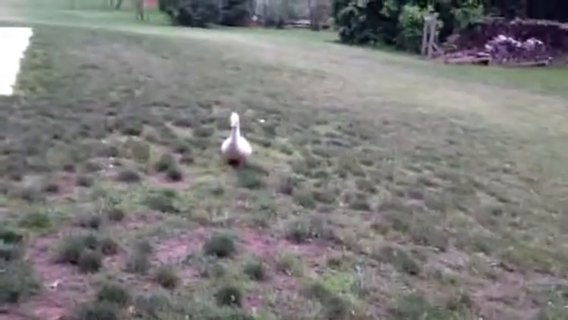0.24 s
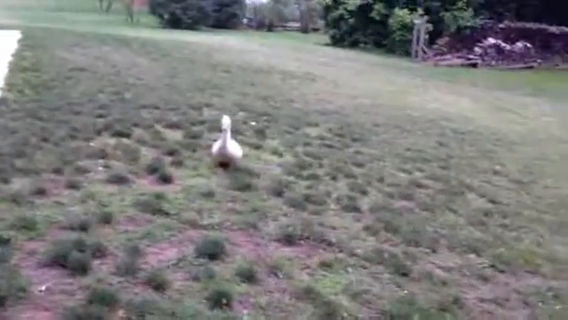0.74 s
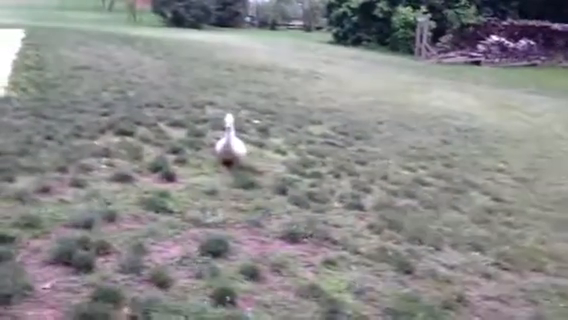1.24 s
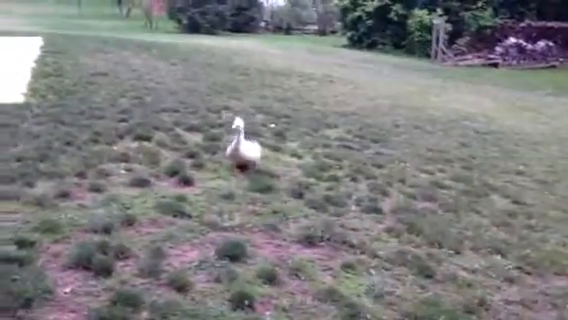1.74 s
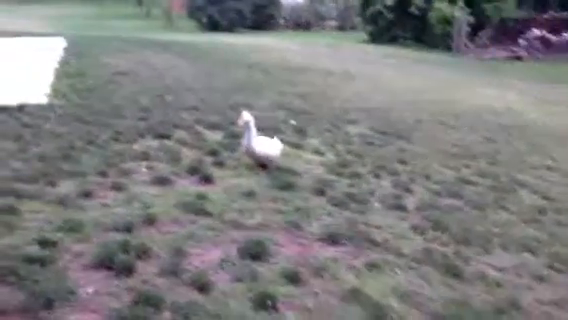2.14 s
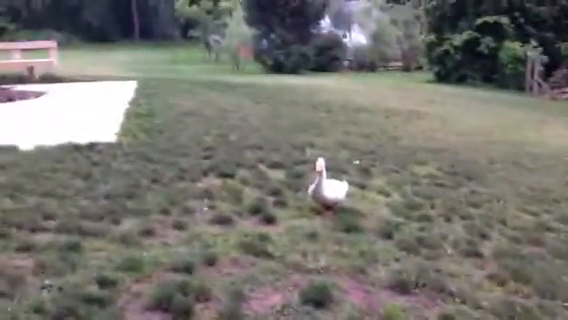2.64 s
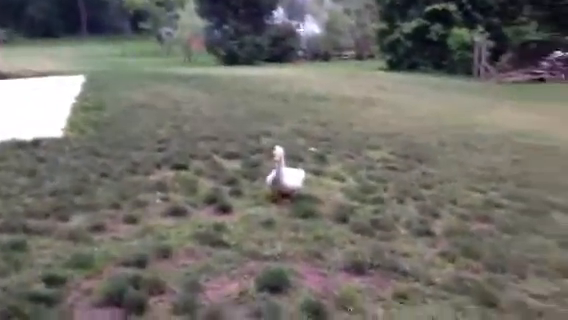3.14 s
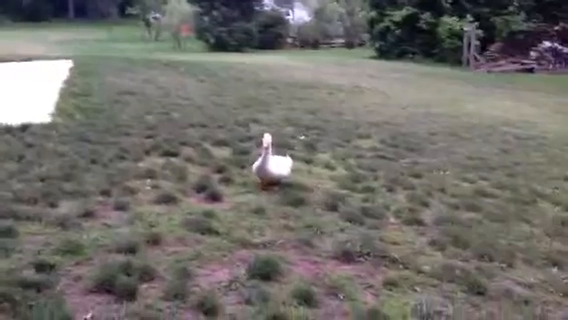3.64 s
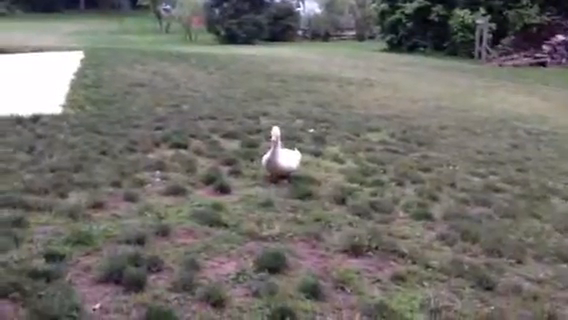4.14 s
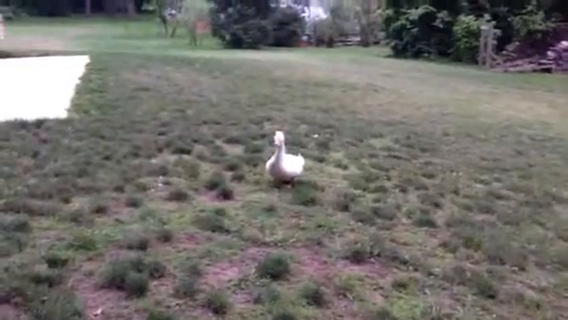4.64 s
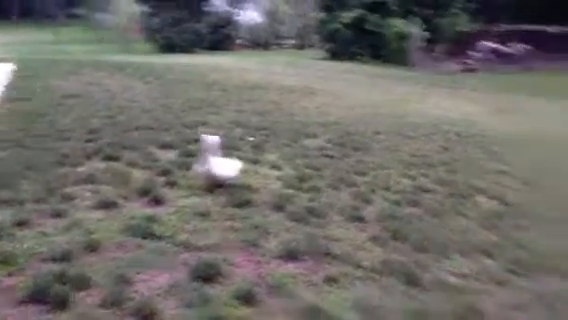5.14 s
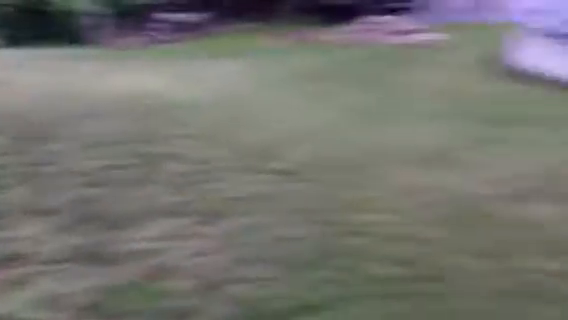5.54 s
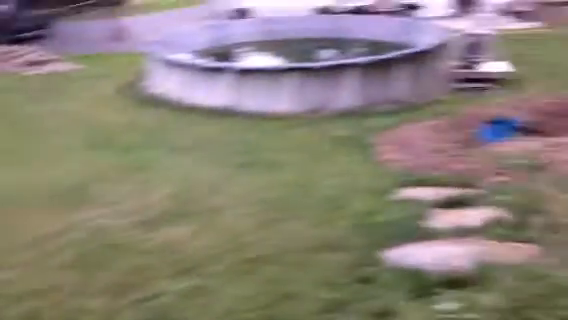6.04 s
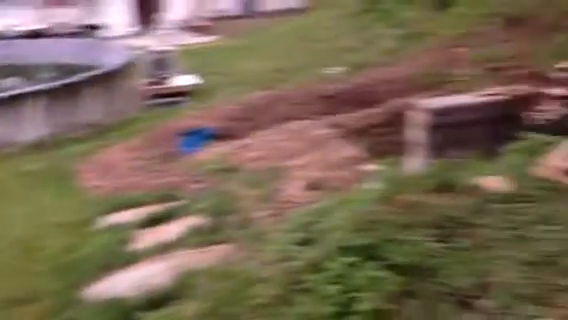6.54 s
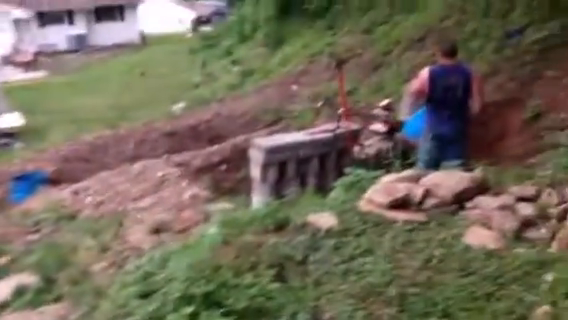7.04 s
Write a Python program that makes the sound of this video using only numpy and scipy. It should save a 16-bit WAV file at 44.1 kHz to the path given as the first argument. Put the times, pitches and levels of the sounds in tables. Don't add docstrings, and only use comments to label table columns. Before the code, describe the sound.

A duck gives six slow, raspy quacks on a lawn while an unseen shovel clanks on stones and thuds into soil over a faint motor drone.

```python
import sys
import numpy as np
from scipy import signal
from scipy.fft import rfft, irfft, next_fast_len
from scipy.io import wavfile
from scipy.ndimage import uniform_filter1d, map_coordinates

SR = 44100
rng = np.random.default_rng(int(sys.argv[2]) if len(sys.argv) > 2 else 0)


def voltage_ratio(level):
    return 10 ** (np.asarray(level, float) / 20)


def generate_wav(signal):
    frames = np.transpose(np.atleast_2d(signal))
    scaled = np.clip(frames, -1, 1) * 32767
    pcm = np.round(scaled).astype(np.int16)
    wavfile.write(sys.argv[1], SR, pcm)


N = 321489

# time in seconds, pitch in Hz.
MOTOR_PITCH = [(0, 123.4), (1.0, 122.6), (2.2, 121.3), (2.6, 122.3), (3.5, 120.9), (5.2, 118.1),
               (7.29, 118.1)]
# time in seconds, level in dB.
MOTOR_LEVEL = [(0, -61.5), (.65, -58), (1.36, -66.5), (1.74, -59.5), (2.3, -62), (2.6, -63.5), (3.4, -59.5),
               (3.65, -64), (3.95, -60.5), (4.4, -63), (5.05, -62.5), (5.34, -66.5), (5.9, -61),
               (6.35, -59.5), (6.62, -63.5), (7.29, -61)]
# frequency in Hz, density in dB per Hz.
RUMBLE_COLOUR = [(15, -62), (25, -52), (86, -18), (99, -7.5), (118, -5), (146, -0.5), (303, -1.5),
                 (362, -6.5), (426, -5), (1200, -34), (1560, -58), (2640, -120)]
# time in seconds, level in dB.
RUSTLE_LEVEL = [(0, -71.5), (.6, -79), (1.4, -75), (2.2, -72.5), (3.2, -75.5), (4.2, -77.5), (5.3, -73),
                (6, -72.5), (6.4, -75), (6.8, -70.5), (7.29, -68.5)]
# frequency in Hz, density in dB per Hz.
LEAF_COLOUR = [(600, -36), (1200, -18), (2200, -3), (3800, -8.5), (5100, -9.5), (7000, -32)]
# start in seconds, level in dB, hold in seconds, t60 in seconds.
SCRAPES = [
    (.002, -55, 0.0036, 0.31),
    (2.378, -45, 0.016, 0.51),
    (4.359, -55.5, .045, .36),
    (4.955, -58, 0.014, 0.41),
    (5.097, -60, 0.0066, 0.42),
    (6.165, -70, 0.13, 0.37),
    (6.477, -52, 0.022, .2),
    (6.5, -55.5, 0.036, 0.45),
]
# frequency in Hz, width in Hz, level in dB.
BLADE_MODES = [(1510, 170, 3.5), (2067, 126, 4.5), (2630, 164, 4.5), (3124, 63, 7.5), (3490, 300, 1),
               (4600, 310, -4), (5770, 240, -7)]
# frequency in Hz, density in dB per Hz.
GRIT_COLOUR = [(500, -23), (1000, -6.5), (2500, -16), (5000, 5.5), (8000, -11), (13000, -23)]
# start in seconds, length in seconds, start pitch in Hz, end pitch in Hz, level in dB.
BIRD_NOTES = [(0.068, 0.048, 1790, 1600, -70), (.44, 0.036, 2540, 2370, -74),
              (1.275, 0.022, 5180, 5450, -65.5), (2.368, 0.023, 2910, 3060, -60),
              (3.269, 0.023, 1980, 1920, -69), (4.009, 0.067, 3460, 3800, -78),
              (4.045, 0.091, 3880, 3640, -73.5), (4.298, .05, 2880, 2850, -70),
              (6.006, .14, 1754, 1590, -71.5), (6.7, 0.017, 4500, 4370, -71),
              (6.911, 0.022, 1280, 1490, -67), (7.0, 0.023, 3224, 3100, -68),
              (7.133, 0.088, 2430, 2390, -65)]
# start in seconds, level in dB.
CHIP_PHRASE = (.017, 5120, 5000), [(.225, -71), (.27, -78), (.495, -75), (.53, -69), (.575, -72),
               (1.245, -73), (2.265, -73), (2.3, -73), (3.365, -76), (3.41, -77), (3.45, -74)]
TSIP_PHRASE = (0.018, 4820, 4450), [(6.16, -70), (6.205, -75), (6.255, -67), (6.735, -65), (6.775, -62.5),
               (6.83, -62.5)]
RISING_PHRASE = (0.0387, 1780, 2057), [(6.44, -73), (6.712, -64), (6.945, -63), (7.18, -63)]
FALLING_PHRASE = (0.038, 2930, 2370), [(6.56, -61), (6.795, -62.5), (7.04, -60.5)]
# start in seconds, peak in dB, snap in dB over the peak, ring in Hz.
TAPS = [(.367, -55, -15, 2450), (.506, -53, -15, 830), (1.156, -53.5, 8, 1880), (1.174, -45.5, 2, 1805),
        (2.379, -29, -26, 1997), (2.393, -29, -27, 2036), (3.271, -52, -18, 1940),
        (4.076, -51.5, -17, 1950), (4.312, -51, -9, 2860), (4.351, -44, -12, 2140), (4.361, -38, -22, 2374),
        (4.957, -41.5, -24, 2270), (5.095, -40.5, -27, 1940), (5.174, -47.5, -19, 1510),
        (6.208, -55, -17, 4617), (6.476, -41, 3.5, 3370), (6.493, -33.5, -5, 1530), (6.53, -38, -22, 5550),
        (6.556, -42.5, -8, 2800), (6.732, -47, -25, 956), (6.799, -47.5, -6, 1220),
        (7.099, -34.5, -34, 930), (7.161, -39, -29, 1420), (7.239, -48.5, -20, 2644)]
# start in seconds, peak in dB.
CLACKS = [
    (0.628, -47.5),
    (1.615, -51.5),
    (1.643, -46.5),
    (2.591, -49.5),
    (3.524, -46.5),
    (4.449, -46),
    (5.455, -50),
]
# voice full at in seconds, bill fully open after in seconds, bill shuts after in seconds,
# throat level in dB, fastest flaps per second.
QUACKS = [
    (.688, .24, 0.32, -39, 89.5),
    (1.704, .22, 0.33, -40, 92),
    (2.649, 0.22, .34, -38.5, 87.4),
    (3.567, 0.22, 0.29, -39.5, 90.5),
    (4.508, .21, .315, -39.5, 87),
    (5.505, 0.22, 0.38, -45.5, 93),
]
HEAD_TURN_DB = [-3, 1.5, 0.5, 1, 0, 6]
# frequency in Hz, width in Hz, level in dB.
THROAT_MODES = [(1234, 111, -6), (1420, 33.7, 4.5), (1765, 48.5, 6.5)]
# frequency in Hz, width in Hz, level in dB.
WEAK_THROAT_MODES = [(1171, 68, 5.5), (1373, 82, 4), (1590, 140, -14)]
# frequency in Hz, width in Hz, level in dB.
BILL_BASE_MODES = [(2200, 94, 6), (2580, 230, 0.5)]
# frequency in Hz, width in Hz, level in dB.
BILL_TIP_MODES = [(2787, 94, 4), (3366, 114, -3.5)]
# frequency in Hz, width in Hz, level in dB.
WHISTLE_MODES = [(3820, 930, 0.5), (4530, 197, 9.5), (4914, 260, 1.5), (5820, 850, -8.5),
                 (7000, 1400, -22.5)]
# frequency in Hz, width in Hz, dip in dB.
POCKETS = [(2040, 200, -16), (3620, 220, -14), (5560, 300, -10)]
# start in seconds, peak in dB, pitch in Hz, t60 in seconds.
THUDS = [(1.174, -39, 194, 0.02), (2.38, -32, 537, 0.015), (2.394, -40, 194, 0.053),
         (4.365, -40, 332, 0.041), (4.398, -45, 169, 0.062), (4.954, -47, 231, 0.046),
         (4.971, -39.5, 278, 0.035), (6.495, -25, 240, 0.031), (6.503, -38, 163, 0.068),
         (7.098, -36, 255, 0.027), (7.109, -44.5, 183, 0.039)]
# start in seconds, level in dB, pitch in Hz, t60 in seconds.
RINGS = [
    (2.381, -45, 2030, 0.38),
    (2.381, -46, 3250, 0.42),
    (6.53, -60.5, 5700, 0.5),
    (7.1, -55, 4500, .03),
]
# frequency in Hz, t60 in seconds.
YARD_T60 = [(300, 0.36), (2000, 0.33), (8000, 0.19)]
# frequency in Hz, density in dB per Hz.
HISS_COLOUR = [(410, -11), (700, -0.5), (906, -2), (3050, -7), (3750, -3.5), (5660, -6), (13800, -8.5),
               (15300, -11.5)]

ATTACK_S, ATTACK_DB, SWELL_DB = 0.038, 22, 2.5
SETTLE_S, SETTLE_DB = 0.04, 1.5
DROOP_S, DROOP = 0.021, 0.84
SHUT_S, SHUT_DB, FADE_S, FADE_DB = 0.055, 12, 0.065, 55
REST_RATE, RATE_SAG = 75.5, 0.6
TURN_DULLS = 0.73
BILL_SHUT_DB, BILL_OPEN_DB = -23, -3.5
TIP_SHUT_DB, TIP_OPEN_DB = -32.5, -10
WHISTLE_SHUT_DB, WHISTLE_OPEN_DB = -20, -9.5
THROAT_SHIFT, SHIFTS_PER_S = 0.03, 20


def unit(x):
    return x / np.sqrt(np.mean(x ** 2) + 1e-20)


def along(points, hz):
    f, v = np.transpose(points)
    return np.interp(np.log(hz + 1), np.log(f + 1), v)


def curves(rows):
    s, *cols = np.transpose(rows)
    return [np.interp(np.arange(N) / SR, s, c) for c in cols]


def spans(tables):
    rows = []
    for table in tables:
        first, last = table[0], table[-1]
        rows += [(first[0] - 0.006, -120, *first[2:]), *table, (last[0] + 0.012, -120, *last[2:])]
    return curves(rows)


def wobble(rate):
    knots = rng.standard_normal(int(N * rate / SR) + 4)
    return map_coordinates(knots, [np.arange(N) * rate / SR])


def filtered(x, response):
    m = next_fast_len(N + SR // 2)
    return irfft(rfft(x, m) * response(np.fft.rfftfreq(m, 1 / SR)), m)[:N]


def bandpass(x, order, low_hz, high_hz):
    return signal.sosfilt(signal.butter(order, [low_hz, high_hz], "bandpass", fs=SR, output="sos"), x)


def resonant(x, modes, low_hz, high_hz):
    def body(f):
        total = 0
        for k, (c, w, db) in enumerate(modes):
            total = total + (-1) ** k * voltage_ratio(db) * 1j * f * w / (c * c - f * f + 1j * f * w)
        return total

    return unit(bandpass(filtered(x, body), 3, low_hz, high_hz))


def noise(spectrum, patchy_db):
    z = signal.stft(rng.standard_normal(N), nperseg=512)[2]
    field = uniform_filter1d(uniform_filter1d(rng.standard_normal(z.shape), 5, 0), 10, 1)
    x = signal.istft(z * voltage_ratio(patchy_db * unit(field)), nperseg=512)[1][:N]
    return unit(filtered(x, lambda hz: voltage_ratio(along(spectrum, hz))))


def add(track, s, sound):
    part = track[round(s * SR):][:len(sound)]
    part += sound[:len(part)]


def motor():
    (hz,), (rumble_db,) = curves(MOTOR_PITCH), curves(MOTOR_LEVEL)
    mean_db = rumble_db.mean()
    drone_db = mean_db - 3.5 + 1.15 * (rumble_db - mean_db) + 0.9 * wobble(4.28)
    phase = 2 * np.pi * np.cumsum(hz + 0.76 * wobble(12)) / SR
    drone = voltage_ratio(drone_db + 3.0 + 0.33 * wobble(11)) * np.sin(phase)
    slipping = voltage_ratio(drone_db - 19) * np.sin(0.97 * phase)
    throb = 1 + 0.078 * np.cos(phase / 2) + 0.37 * np.cos(phase)
    rumble = unit(throb * voltage_ratio(0.59 * wobble(25)) * noise(RUMBLE_COLOUR, patchy_db=3.0))
    return drone + slipping + voltage_ratio(rumble_db + 1.0) * rumble


def garden():
    return voltage_ratio(curves(RUSTLE_LEVEL)[0]) * noise(LEAF_COLOUR, patchy_db=2.5)


def scrapes():
    grains = voltage_ratio(1.26 * wobble(250) + 0.65 * wobble(50))
    steel = resonant(grains * rng.standard_normal(N), BLADE_MODES, low_hz=905, high_hz=9050)
    drag = unit(steel + 0.5 * unit(grains * noise(GRIT_COLOUR, patchy_db=2.5)))
    stroke, t = np.zeros(N), np.arange(SR // 2) / SR
    for s, db, held, t60 in SCRAPES:
        shape_db = db - 60 * np.clip(t - held, 0, None) / t60
        onset = np.clip(t / 0.0042 + 0.9, 0, 1)
        add(stroke, s, voltage_ratio(shape_db) * onset)
    return stroke * drag


def birds():
    out = np.zeros(N)
    air_db = 3 * wobble(120)
    notes = list(BIRD_NOTES)
    for note, rows in (CHIP_PHRASE, TSIP_PHRASE, RISING_PHRASE, FALLING_PHRASE):
        notes += [(s, *note, db) for s, db in rows]
    for s, length, start_hz, end_hz, db in notes:
        u = np.arange(round(length * SR)) / (length * SR)
        hz = start_hz + (end_hz - start_hz) * u ** 1.31
        flutter_db = air_db[round(s * SR):][:len(u)]
        swell = np.sin(np.pi * u) ** 0.79
        add(out, s, voltage_ratio(db + 3.5 + flutter_db) * swell * np.sin(2 * np.pi * np.cumsum(hz) / SR))
    return out


def contacts(rows):
    ring, burst, snap = np.zeros((3, N))
    t, t60 = np.arange(SR // 8) / SR, 0.05
    for s, db, snap_db, hz in rows:
        air = rng.standard_normal((2, len(t)))
        blunt = max(round((3000 / hz) ** 2), 1)
        dull = unit(uniform_filter1d(uniform_filter1d(air[0], size=blunt), size=blunt))
        tones = np.sin(2 * np.pi * hz * t) + 0.34 * np.sin(2 * np.pi * hz * 1.5 * t)
        add(ring, s, voltage_ratio(db - 4.5 - 60 * t / t60) * tones * (1 - np.exp(-t / 0.0012)))
        add(burst, s, voltage_ratio(db - 5 - 60 * t / (0.69 * t60)) * (1 - np.exp(-t / 0.00053)) * dull)
        add(snap, s, voltage_ratio(db + snap_db - 10 - 60 * t / 0.027) * air[1])
    return ring + bandpass(burst, 2, 457, 3800) + bandpass(snap, 2, 4500, 14000)


def taps():
    return contacts(TAPS)


def bill_clacks():
    return contacts([(s, db, -31, 1122) for s, db in CLACKS])


def quack_shape(s, open_s, shut_s, db, rate, turn_db):
    sagged = rate - RATE_SAG * (rate - REST_RATE)
    early_db = db - SWELL_DB + TURN_DULLS * max(turn_db, 0)
    open_s = min(open_s, shut_s - DROOP_S - 0.005)
    shut = s + shut_s
    rows = [(s - ATTACK_S, early_db - ATTACK_DB, 0, REST_RATE),
            (s, early_db - SETTLE_DB, 0, REST_RATE),
            (s + SETTLE_S, early_db, SETTLE_S / open_s, REST_RATE + 1),
            (s + open_s, db, 1, rate),
            (shut - DROOP_S, db, 1, rate),
            (shut, db, DROOP, rate),
            (shut + SHUT_S / 2, db - SHUT_DB / 2, 0.2, (rate + sagged) / 2),
            (shut + SHUT_S, db - SHUT_DB, 0, sagged),
            (shut + SHUT_S + FADE_S, db - SHUT_DB - FADE_DB, 0, sagged)]
    return [(*row, turn_db) for row in rows]


def throat_pockets(x):
    def dip(f, c, w, db):
        return (c * c - f * f + 1j * f * w * voltage_ratio(db)) / (c * c - f * f + 1j * f * w)

    return filtered(x, lambda f: np.prod([dip(f, *row) for row in POCKETS], axis=0))


def duck():
    calls = [quack_shape(*row, turn) for row, turn in zip(QUACKS, HEAD_TURN_DB)]
    throat_db, opening, rate, turn_db = spans(calls)
    tip_db = TIP_SHUT_DB + (TIP_OPEN_DB - TIP_SHUT_DB) * opening + turn_db
    bill_db = BILL_SHUT_DB + (BILL_OPEN_DB - BILL_SHUT_DB) * opening ** 0.77 - 0.63 * turn_db
    whistle_db = WHISTLE_SHUT_DB + (WHISTLE_OPEN_DB - WHISTLE_SHUT_DB) * opening ** 1.6
    whistle_db = whistle_db - 0.52 * turn_db * (1 - opening)

    cycles = np.cumsum(rate * (1 + 0.035 * wobble(70))) / SR
    turn, index = cycles % 1, cycles.astype(int)
    size = voltage_ratio(1.0 * rng.standard_normal((index[-1] + 1, 3)))[index]

    def flap(column, lag, open_share, click_share, leak_db):
        late = (turn - lag) % 1
        click = unit(1.0 * (np.diff(late, prepend=0) < 0))
        rush = late / open_share * np.exp(1 - late / open_share)
        puff = unit((rush + voltage_ratio(leak_db)) * rng.standard_normal(N))
        return size[:, column] * (click_share * click + puff)

    low = flap(column=0, lag=0, open_share=0.11, click_share=1.5, leak_db=-11)
    middle = flap(column=1, lag=0.1215, open_share=0.12, click_share=0.65, leak_db=-14)
    high = flap(column=2, lag=0.1186, open_share=0.1, click_share=0.55, leak_db=-13)

    def neck(shift):
        modes = [(c * (1 + shift), w, db) for c, w, db in THROAT_MODES]
        return resonant(low, modes, low_hz=1030, high_hz=1940)

    flex = np.clip(0.5 + 0.3 * wobble(SHIFTS_PER_S), 0, 1) * np.pi / 2
    full = unit(np.sin(flex) * neck(THROAT_SHIFT / 2) + np.cos(flex) * neck(-THROAT_SHIFT / 2))
    weak = resonant(low, WEAK_THROAT_MODES, low_hz=1050, high_hz=1940)
    effort = np.clip((throat_db + 56) / 12, 0, 1)
    voice = effort * full + (1 - effort) * weak
    voice += voltage_ratio(bill_db - 2.0) * resonant(middle, BILL_BASE_MODES, low_hz=2104, high_hz=2610)
    voice += voltage_ratio(tip_db) * resonant(middle, BILL_TIP_MODES, low_hz=2520, high_hz=3550)
    whistle = resonant(high, WHISTLE_MODES, low_hz=3900, high_hz=7900)
    voice += voltage_ratio(whistle_db - 1.15 - 12 * (1 - effort)) * whistle
    return voltage_ratio(throat_db + 0.22) * throat_pockets(voice)


def thuds():
    out, t = np.zeros(N), np.arange(SR // 8) / SR
    for s, db, hz, t60 in THUDS:
        air = rng.standard_normal(len(t))
        puff = 1.32 * uniform_filter1d(uniform_filter1d(air, size=30), size=14)
        push = np.sin(2 * np.pi * hz * t) + puff
        add(out, s, voltage_ratio(db + 6.5 - 60 * t / t60) * push * (1 - np.exp(-t / 0.003)))
    return out


def rings():
    out, t = np.zeros(N), np.arange(SR // 3) / SR
    drift, damp_db = 0.012 * wobble(150), 2.5 * wobble(80)
    for s, db, hz, t60 in RINGS:
        start = round(s * SR) // 2
        here = slice(start, start + len(t))
        waver = np.cumsum(drift[here])
        add(out, s, voltage_ratio(db - 60 * t / t60 + damp_db[here]) * np.sin(2 * np.pi * hz * t + waver))
    return out


def yard(x):
    hz, t, z = signal.stft(rng.standard_normal(SR // 2), SR, nperseg=256)
    decay = voltage_ratio(-60 * t / along(YARD_T60, hz)[:, None])
    tail = signal.istft(z * decay, SR, nperseg=256)[1]
    delayed = np.pad(x, (500, 0))
    return signal.fftconvolve(delayed, tail / np.linalg.norm(tail))[:N]


def scene():
    call, song = duck(), birds()
    knocks = scrapes() + taps() + bill_clacks() + rings()
    echoes = yard(voltage_ratio(-21) * call + voltage_ratio(-13) * knocks + voltage_ratio(-6) * song)
    return (call + knocks + thuds() + song + echoes + motor() + garden())[None]


def band_limit(x):
    return signal.sosfilt(signal.butter(12, 15480, fs=SR, output="sos"), x)


def record(dry):
    bass_cut = signal.butter(2, 95, "highpass", fs=SR, output="sos")
    sound = signal.sosfilt(bass_cut, dry[0]) + voltage_ratio(-67.5) * noise(HISS_COLOUR, patchy_db=0.6)
    mix = filtered(sound, lambda hz: hz < 15500)[None]
    return band_limit(mix)


dry = scene()
out = record(dry)
generate_wav(out)
```